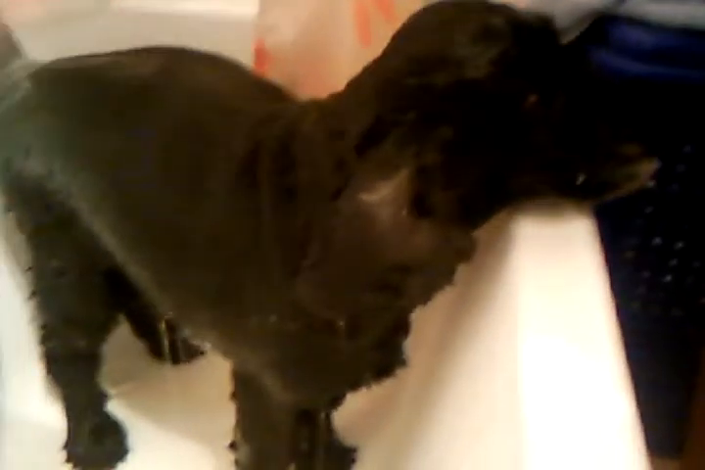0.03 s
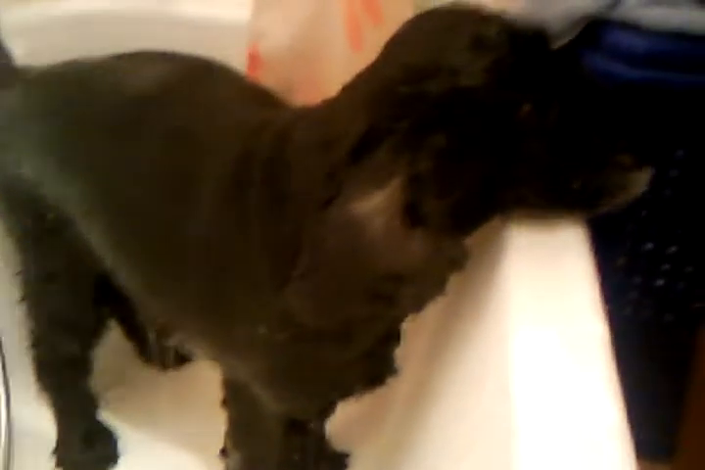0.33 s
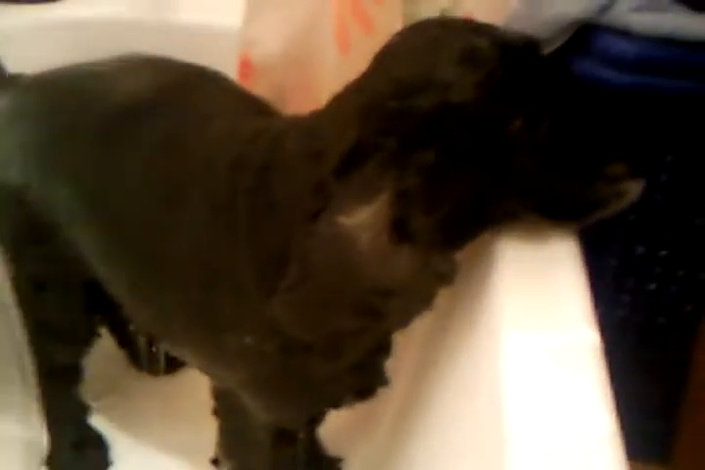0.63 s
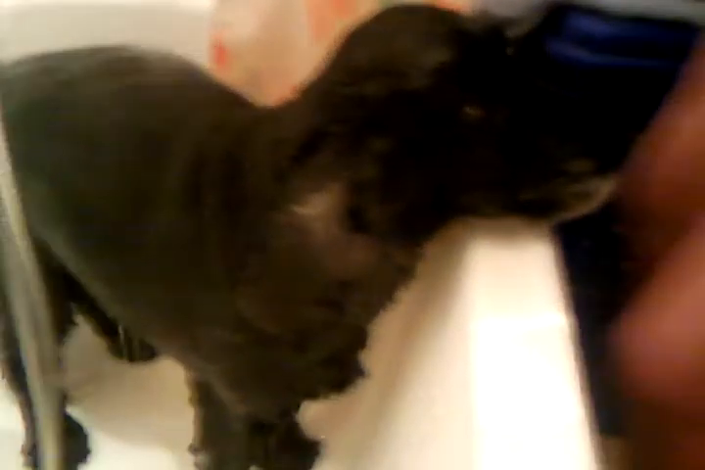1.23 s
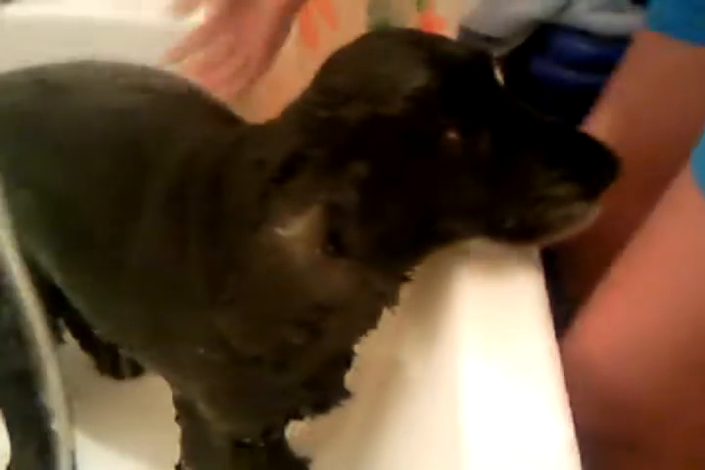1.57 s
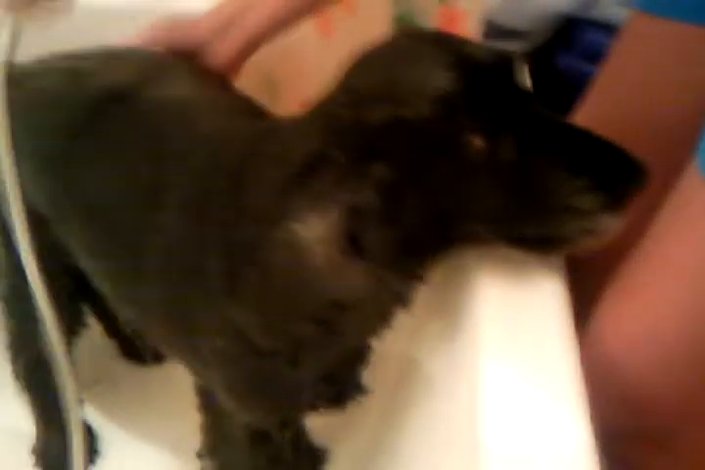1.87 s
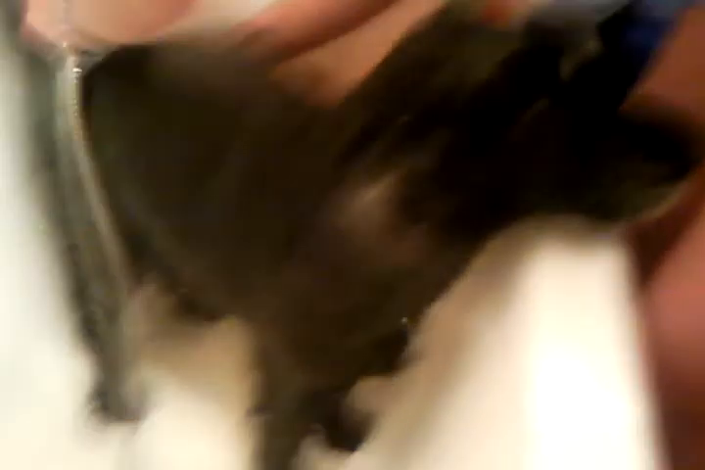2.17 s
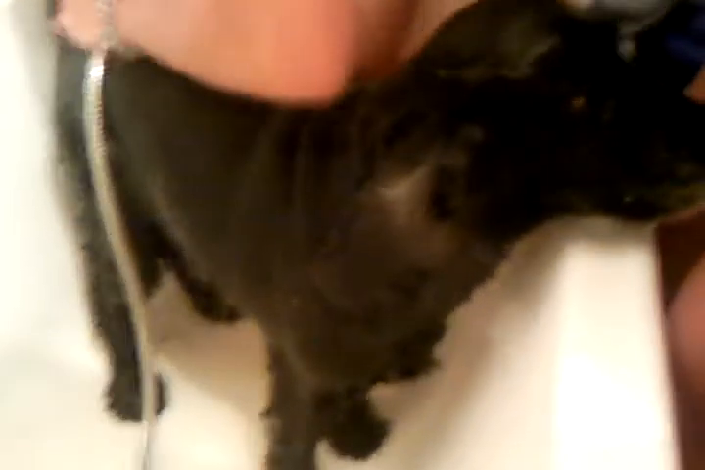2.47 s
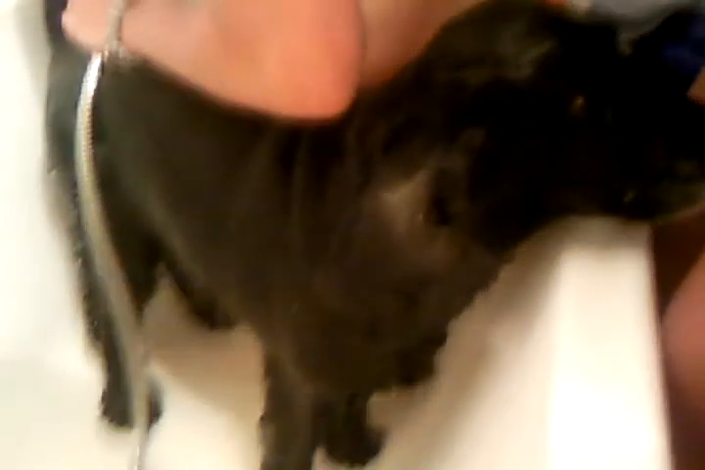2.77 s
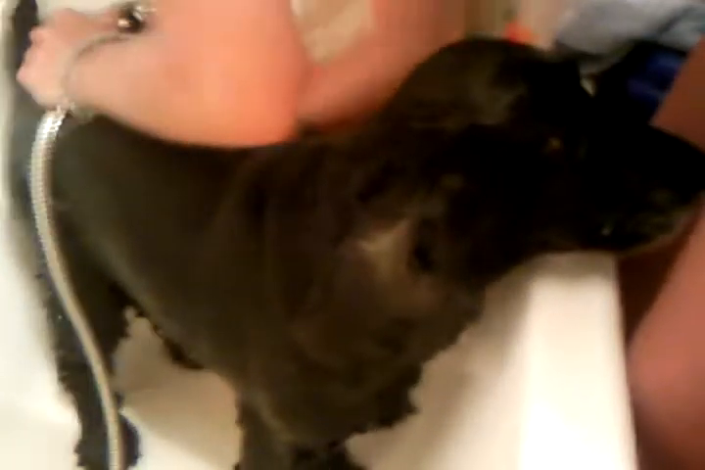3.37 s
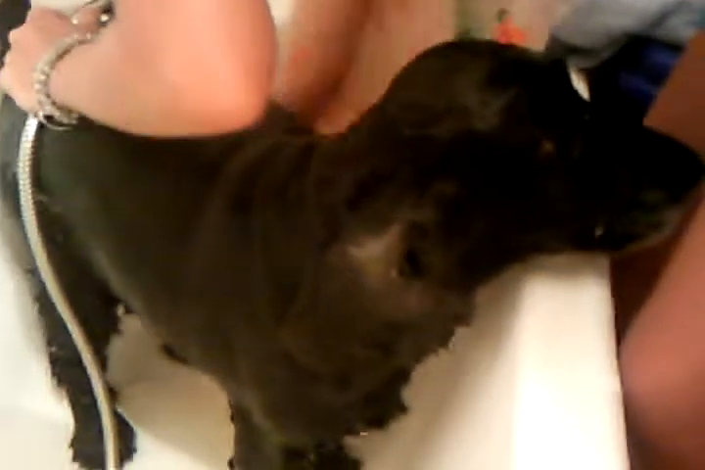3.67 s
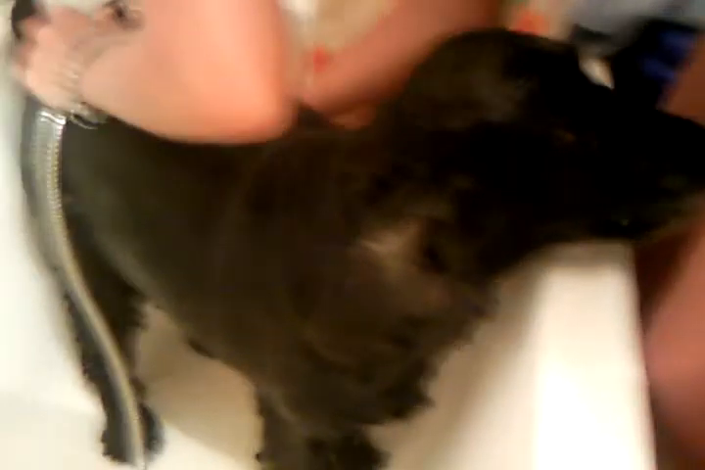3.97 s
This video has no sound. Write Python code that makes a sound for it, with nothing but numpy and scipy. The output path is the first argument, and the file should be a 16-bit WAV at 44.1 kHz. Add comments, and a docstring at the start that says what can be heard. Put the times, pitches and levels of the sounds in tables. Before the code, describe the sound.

Shower spray rinses a dog in a tub, heard up close in a small tiled room. The hiss swells as water knocks on the hollow tub, then settles lower, with drips and trickles falling into shallow water throughout.

```python
"""A hand shower rinses a dog in a bathtub, close by in a small tiled bathroom.
The spray hisses and spatters on the wet coat with a wandering hollow note; now and then the jets
slip off and drum on the tub's shell. Run-off trickles and plops into the shallow water, one
heavier pour splashes down, and the tub thumps and rumbles softly among faint low blips."""
import sys
import numpy as np
from scipy import signal
from scipy.fft import rfft, irfft, next_fast_len
from scipy.io import wavfile
from scipy.ndimage import uniform_filter1d, map_coordinates

SR = 44100
rng = np.random.default_rng(int(sys.argv[2]) if len(sys.argv) > 2 else 0)


def materialize(psi):
    """Save the field psi as 16-bit PCM at rate SR to the path in sys.argv[1].

    A 1-D psi becomes a single channel; in a 2-D psi each row is a channel.
    """
    bounded = np.clip(np.atleast_2d(psi).T, -1, 1)
    quanta = np.round(bounded * 32767).astype(np.int16)
    wavfile.write(sys.argv[1], SR, quanta)


N = 176400

# tile reverb (frequency [Hz], T60 [s])
ROOM_T60 = [(200, 0.3), (2000, 0.15), (12000, 0.071)]
# shell modes (centre [Hz], width [Hz], relative gain [dB])
TUB_MODES = [(154.3, 12.5, 5.5), (212, 31, -6.5), (256, 23, -2.5), (310.4, 14, 3.5), (348.2, 10.2, 7),
             (399, 17, 4.5), (459, 62, -0.5), (507, 28, 3), (550.7, 14.5, 2.5), (589.4, 19.6, 3),
             (653, 39, 1), (757, 28, 2.5), (775, 78, -3.5), (894, 46, -6)]
# tub under shifting weight (start [s], end [s], level [dB], centre [Hz])
RUMBLES = [(0.108, 0.203, -48, 105.3), (0.266, 0.322, -54, 112), (0.822, 0.864, -45, 74),
           (1.075, 1.167, -46.5, 76.8), (1.655, 1.693, -51, 80), (1.81, 1.84, -54, 95),
           (2.353, 2.39, -57, 80), (3.18, 3.247, -51, 94.6), (3.4, 3.471, -50, 88),
           (3.498, 3.76, -45, 81.4), (3.626, 3.72, -49.5, 138)]
# water slugs on the tub (time [s], gain [dB], pitch [Hz])
THUMPS = [(0.677, -21.5, 151.5), (0.869, -29, 160), (1.06, -26, 150.1), (1.204, -27.5, 154),
          (1.626, -27.5, 154.8), (1.79, -53, 152.4), (3.15, -45, 170.7), (3.22, -47, 150.2)]
# short low notes (start [s], length [s], level [dB], pitch [Hz])
LOW_BLIPS = [(0, 0.1, -48, 277), (.44, 0.083, -57, 267), (1.116, 0.18, -35, 348),
             (1.592, 0.091, -43.5, 321), (1.71, .1, -52, 342), (1.83, 0.12, -50, 343.5),
             (2.22, 0.082, -54, 300), (2.327, 0.095, -56, 205.6), (2.553, 0.07, -57, 210),
             (2.783, .14, -51, 340), (2.979, 0.094, -53, 270), (3.05, 0.064, -59, 225),
             (3.852, .11, -57, 264)]
# jets on the bare tub (start [s], end [s], level [dB], swell [dB], tilt [dB/octave])
DRUM_BURSTS = [(0, 0.17, -46, -3.5, 0.5), (0.673, 0.74, -29.5, -6.5, 2.5), (0.769, 0.865, -35.5, 3.5, 3.5),
               (0.889, 1.109, -30.5, 2.5, 2), (1.144, 1.223, -31, -6.5, 2.5), (1.277, 1.342, -45, -2, -19),
               (1.611, 1.661, -40.5, -1, -7.5), (1.716, 1.85, -50, 0.5, -15)]
# moving resonances (time [s], centre [Hz], level [dB])
POUR_TRACK = [(2.865, 1330, -42), (2.93, 1127, -44), (2.994, 1016, -36.5)]
HOLLOW_TRACK = [(0, 2096, -38), (.4, 2085, -64), (0.748, 2158, -34), (1.12, 2407, -32.5), (1.4, 2602, -46),
                (1.721, 2756, -40), (1.88, 2410, -45), (2.07, 1943, -41), (2.22, 1953, -50),
                (2.37, 1970, -39), (2.6, 2020, -44), (2.8, 2064, -39.5), (2.95, 2050, -47),
                (3.1, 2046, -42.5), (3.28, 2080, -48), (3.7, 2076, -40), (3.95, 2432, -38)]
# falling water envelopes (time [s], level [dB])
DRIBBLE_LEVEL = [(0, -43.5), (.2, -46), (.36, -53), (.52, -55.5), (.57, -88), (.63, -78), (.7, -51),
                 (1.3, -50), (1.44, -43), (1.5, -88), (1.58, -46), (1.78, -65), (2.1, -50), (2.25, -48),
                 (2.7, -47.5), (3.0, -46), (3.4, -44.5), (4, -48)]
RUNOFF_LEVEL = [(0, -32), (.17, -39.5), (.38, -45), (.6, -58), (.75, -34.5), (1.15, -44.5), (1.26, -70),
                (1.36, -45.5), (1.8, -44), (2.3, -42), (2.75, -42.5), (3.0, -40.5), (3.15, -43.5),
                (3.5, -42), (4, -45)]
# spray envelopes before trim, low to high band (time [s], level [dB])
SPATTER_LEVEL = [(0.0, -32), (0.08, -34.5), (0.26, -29), (0.42, -31.5), (0.56, -25), (0.76, -21.5),
                 (1.12, -22), (1.39, -28.5), (1.45, -24), (1.61, -30), (1.73, -27.5), (1.9, -30),
                 (2.24, -31.5), (2.34, -30.5), (2.61, -34.5), (2.76, -32.5), (2.95, -35), (3.05, -31.5),
                 (3.26, -35), (4.0, -33)]
HISS_LEVEL = [(0, -27.5), (.18, -29), (.26, -27), (.34, -29), (.46, -23), (.52, -21.5), (.62, -20),
              (.68, -18), (.9, -18), (1.0, -20.5), (1.2, -21), (1.28, -20), (1.33, -22), (1.41, -24),
              (1.47, -19), (1.53, -19), (1.61, -27.5), (1.66, -23), (1.69, -25.5), (1.74, -23),
              (1.86, -25.5), (1.95, -25), (2.14, -24.5), (2.19, -29), (2.4, -30), (2.5, -26.5),
              (2.65, -30.5), (2.71, -26), (2.85, -25.5), (2.93, -31), (3.17, -27.5), (3.29, -32),
              (3.42, -29), (3.65, -30.5), (3.82, -28.5), (3.86, -23.5), (3.92, -29.5), (4, -26.5)]
MIST_LEVEL = [(0.0, -31.5), (0.2, -38.5), (0.42, -33), (0.53, -28), (0.72, -25.5), (1.28, -28.5),
              (1.41, -31.5), (1.48, -27.5), (1.65, -39), (1.74, -27), (1.83, -39), (1.92, -28), (2.15, -33),
              (2.36, -33), (2.53, -28), (2.63, -35.5), (2.84, -29.5), (2.94, -34.5), (3.1, -33.5),
              (3.47, -30.5), (3.56, -32.5), (3.86, -33), (4.0, -38)]
# spectral shapes (frequency [Hz], relative gain [dB])
FLOOR_EQ = [(25, 15), (70, -11), (150, -23), (300, -27), (900, -80)]
DRIBBLE_EQ = [(150, -43), (240, -11.5), (340, -4.5), (420, -8), (520, 5), (620, -1), (730, -4.5), (850, 8),
              (1100, 1)]
RUNOFF_EQ = [(200, -67), (300, -28), (600, -36), (740, -31), (850, -5), (1100, 1), (1300, -2.5),
             (1500, -2.5), (2200, -5.5), (5000, -46)]
SLAP_EQ = [(200, -42), (400, -8), (550, 3), (1100, -4), (1800, -7), (4000, -34)]
SPATTER_EQ = [(600, -80), (950, -30), (1300, -7), (1600, -9), (1850, -3.5), (2300, -3.5), (2900, -1),
              (3700, -1.5), (4600, -0.5), (6000, -2), (9000, -44)]
HISS_EQ = [(1500, -99.5), (3000, -15.5), (4500, -9), (5800, -5.5), (6800, 0), (7500, 0), (8200, -4),
           (9500, -9), (11500, -15), (15000, -22)]
MIST_EQ = [(1500, -90), (5000, -38), (8000, 2.5), (10000, 0), (12000, -2.5), (14500, -4.5)]


def amp(db):
    """Decibels to gain."""
    return 10 ** (np.asarray(db) / 20)


def unit(x):
    """Scale to rms 1."""
    return x / np.sqrt(np.mean(x ** 2) + 1e-20)


def along(points, hz):
    """Interpolate (frequency [Hz], value) on a log axis."""
    f, v = np.transpose(points)
    return np.interp(np.log(hz + 1), np.log(f + 1), v)


def curve(rows):
    """Interpolate (time [s], value) per sample."""
    return np.interp(np.arange(N) / SR, *np.transpose(rows))


def gate(start_s, end_s, attack_s, release_s):
    """Linear rise up to start_s, hold, exponential release from end_s."""
    t = np.arange(N) / SR
    return np.clip((t - start_s) / attack_s + 1, 0, 1) * np.exp(-np.maximum(t - end_s, 0) / release_s)


def wobble(knots_per_s):
    """Smooth random curve."""
    return map_coordinates(rng.standard_normal(4000), [np.arange(N) * knots_per_s / SR + 2], mode="mirror")


def band(centre_hz, width_hz):
    """Narrow noise band around a per-sample centre."""
    phase = 2 * np.pi * np.cumsum(centre_hz) / SR
    return unit(wobble(width_hz) * np.sin(phase) + wobble(width_hz) * np.cos(phase))


def filtered(x, response):
    """Apply a frequency response."""
    size = next_fast_len(N + SR // 2)
    return irfft(rfft(x, size) * response(np.fft.rfftfreq(size, 1 / SR)), size)[:N]


def coloured(x, eq):
    """Apply a spectral shape; rms 1."""
    return unit(filtered(x, lambda hz: amp(along(eq, hz))))


def rush(patchy_db):
    """White noise with random gain patches in time and frequency."""
    spectra = signal.stft(rng.standard_normal(N), nperseg=512)[2]
    patches = uniform_filter1d(rng.standard_normal(spectra.shape), 4, axis=0)
    patches = uniform_filter1d(patches, 9, axis=1)
    return unit(signal.istft(spectra * amp(patchy_db * unit(patches)), nperseg=512)[1][:N])


def grains(per_s, lo_hz, hi_hz, t60_cycles, spread_db, rise, samples):
    """Randomly timed damped rings; rise bends their pitch upward."""
    when, pitch, weight = rng.random((int(per_s * N / SR), 3)).T[:, :, None]
    hz = lo_hz + (hi_hz - lo_hz) * pitch
    cycles = hz * np.arange(samples) / SR
    age = cycles / t60_cycles
    strength = amp(spread_db * np.minimum(-np.log(1 - weight), 4)) * np.sqrt(hz)
    rings = strength * amp(-60 * age) * np.sin(2 * np.pi * cycles * (1 + rise * age))
    at = (when * N).astype(int) + np.arange(samples)
    return unit(np.bincount(at.ravel(), rings.ravel(), N)[:N])


def bathroom(x, segments=24, wet_db=2):
    """Direct sound plus short tile ring; a fresh tail per segment avoids steady tones. Rms 1."""
    hz, t, spectra = signal.stft(rng.standard_normal((segments, SR // 5)), SR, nperseg=256)
    decay = amp(-60 * t / along(ROOM_T60, hz)[:, None])
    tails = signal.istft(spectra * decay, SR, nperseg=256)[1]
    wet = np.zeros(N + SR)
    for part, tail in zip(np.array_split(np.arange(N), segments), tails):
        ring = signal.fftconvolve(x[part], tail / np.linalg.norm(tail))
        wet[part[0]:part[0] + len(ring)] += ring
    return unit(x + amp(wet_db) * wet[:N])


def tub(hz):
    """Hollow shell response: resonances of alternating sign."""
    return sum((-1) ** k * amp(db) * 1j * hz * width / (centre ** 2 - hz ** 2 + 1j * hz * width)
               for k, (centre, width, db) in enumerate(TUB_MODES))


def room_floor(level_db=-57.5):
    """Faint steady room rumble."""
    return amp(level_db) * coloured(rng.standard_normal(N), FLOOR_EQ)


def rumbles():
    """Shifting weight bumps and rubs the tub: low noise bursts."""
    out = np.zeros(N)
    for start_s, end_s, db, hz in RUMBLES:
        envelope = amp(db) * gate(start_s, end_s, attack_s=0.041, release_s=0.013)
        out += envelope * band(np.full(N, hz), width_hz=44)
    return out


def low_blips(rise=0.027, roughness=0.66):
    """Faint, short, rough low notes swell and fade; one louder ring at 348 Hz."""
    out = np.zeros(N)
    for start_s, length_s, db, hz in LOW_BLIPS:
        progress = np.clip((np.arange(N) / SR - start_s) / length_s, 0, 1)
        pitch_hz = hz * (1 + rise * (progress - 0.5))
        note = np.sin(2 * np.pi * np.cumsum(pitch_hz) / SR) + roughness * band(pitch_hz, width_hz=60)
        out += amp(db) * np.sin(np.pi * progress) * note
    return out


def thumps(rise_s=0.03, t60_s=0.28):
    """Slugs of water boom the tub near its lowest mode."""
    out = np.zeros(N)
    for start_s, db, hz in THUMPS:
        t = np.maximum(np.arange(N) / SR - start_s, 0)
        envelope = amp(db - 60 * t / t60_s) * (1 - np.exp(-t / rise_s))
        out += envelope * np.sin(2 * np.pi * hz * t)
    return out


def dribble():
    """Large drips plop into shallow water, coloured by the tub."""
    plops = grains(per_s=190, lo_hz=231, hi_hz=1004, t60_cycles=88,
                   spread_db=0.8, rise=0.024, samples=6000)
    return amp(curve(DRIBBLE_LEVEL)) * coloured(filtered(plops, tub), DRIBBLE_EQ)


def runoff(bubble_db=-2):
    """Water streams off the coat: an even splash with small bubbles."""
    bubbles = grains(per_s=600, lo_hz=694, hi_hz=2240, t60_cycles=33,
                     spread_db=3, rise=0.18, samples=1200)
    water = amp(bubble_db) * bathroom(bubbles) + rush(patchy_db=2.5)
    return amp(curve(RUNOFF_LEVEL)) * coloured(water, RUNOFF_EQ)


def pour(slap_s=2.964, slap_hold_s=0.041, slap_db=-38.5):
    """A heavier stream sinks in pitch, swells and slaps into the water."""
    time_s, hz, db = np.transpose(POUR_TRACK)
    stream = amp(curve(np.c_[time_s, db])) * band(curve(np.c_[time_s, hz]), width_hz=170)
    stream *= gate(time_s[0], time_s[-1], attack_s=0.012, release_s=0.025)
    slap = amp(slap_db) * coloured(rng.standard_normal(N), SLAP_EQ)
    slap *= gate(slap_s, slap_s + slap_hold_s, attack_s=0.0096, release_s=0.027)
    return stream + slap


def drumming(hits_per_s=900, lowpass_hz=1000):
    """Jets patter on the bare shell and ring its modes."""
    out = np.zeros(N)
    for start_s, end_s, db, swell_db, tilt_db_per_oct in DRUM_BURSTS:
        def response(hz):
            octaves = np.log2(np.maximum(hz, 150) / 150)
            return tub(hz) * amp(tilt_db_per_oct * octaves) / (1 + (hz / lowpass_hz) ** 6)

        hits = np.sign(rng.standard_normal(N)) * (rng.random(N) < hits_per_s / SR)
        force = amp(curve([(start_s, db), (end_s, db + swell_db)]))
        force *= gate(start_s, end_s, attack_s=0.028, release_s=0.014)
        out += filtered(hits * force, response) / np.std(filtered(hits, response))
    return out


def hollow_note(wander_hz=109.9):
    """Jets sound a hollow note in the wet coat; it wanders as the shower head moves."""
    time_s, hz, db = np.transpose(HOLLOW_TRACK)
    centre_hz = curve(np.c_[time_s, hz]) + wander_hz * wobble(9)
    return amp(curve(np.c_[time_s, db])) * band(centre_hz, width_hz=520)


def spray():
    """Tiny impacts on the coat over a smooth rush; spatter, hiss and mist bands flutter together."""
    flutter_db = 0.18 * wobble(17) + 0.33 * wobble(70)
    out = np.zeros(N)
    for level, eq, trim_db in [(SPATTER_LEVEL, SPATTER_EQ, 0.3),
                               (HISS_LEVEL, HISS_EQ, 0.6),
                               (MIST_LEVEL, MIST_EQ, 0.3)]:
        drops = grains(per_s=3000, lo_hz=1180, hi_hz=14200, t60_cycles=4.05,
                       spread_db=2.5, rise=0, samples=128)
        water = bathroom(drops) + rush(patchy_db=3.0)
        out += amp(curve(level) + trim_db + flutter_db) * coloured(water, eq)
    return out


def scene():
    """Mono sum of all sources."""
    water = spray() + hollow_note() + runoff() + dribble()
    lows = low_blips() + drumming() + thumps() + rumbles() + room_floor()
    return (water + lows + pour())[None]


def record(dry, cutoff_hz=14650, dc_offset=0.062):
    """Brick-wall low-pass plus a constant offset."""
    return filtered(dry[0], lambda hz: hz < cutoff_hz)[None] + dc_offset


dry = scene()
out = record(dry)
materialize(out)
```